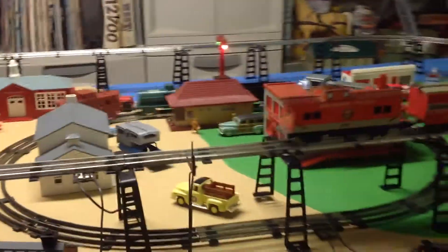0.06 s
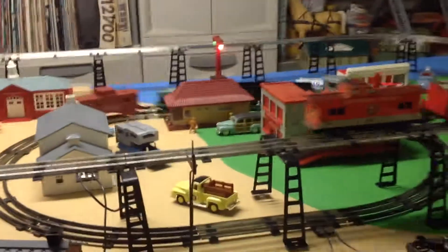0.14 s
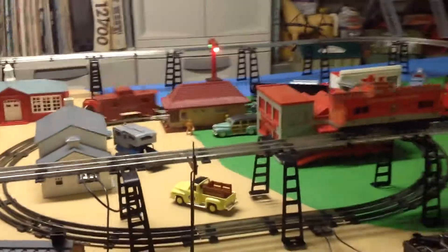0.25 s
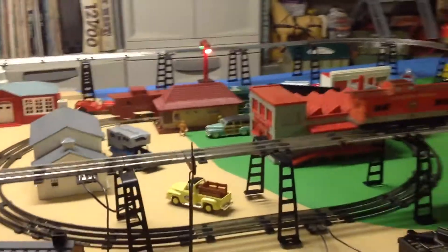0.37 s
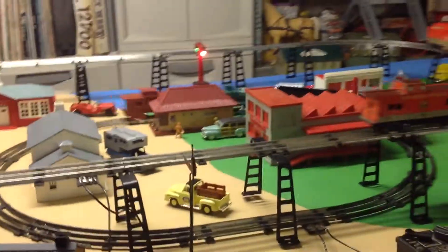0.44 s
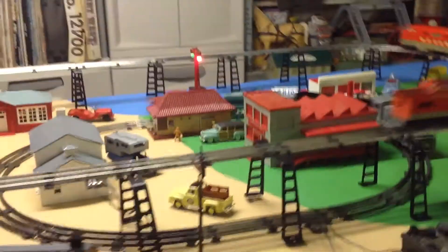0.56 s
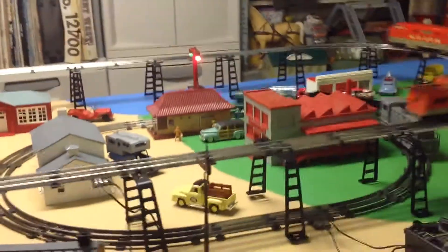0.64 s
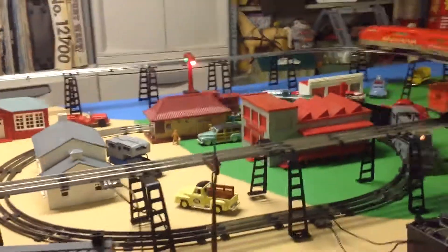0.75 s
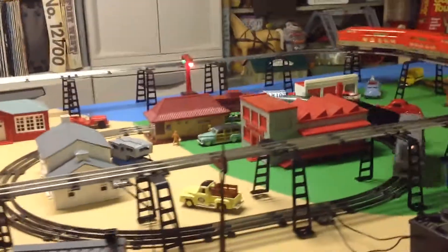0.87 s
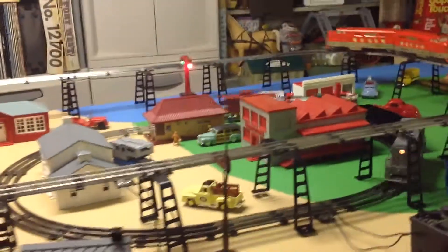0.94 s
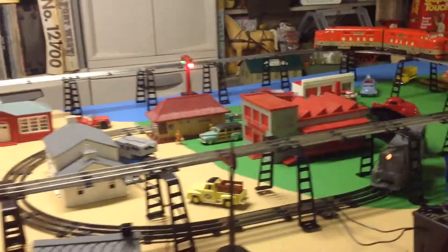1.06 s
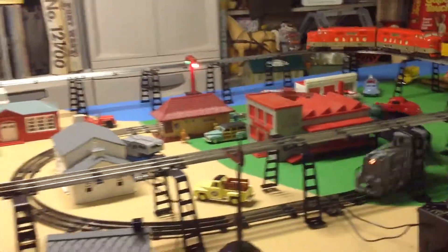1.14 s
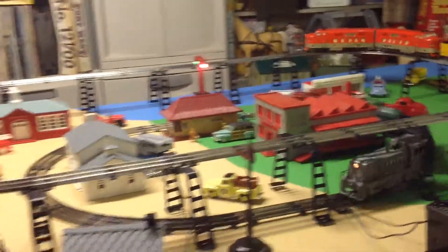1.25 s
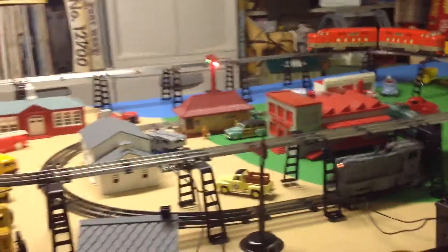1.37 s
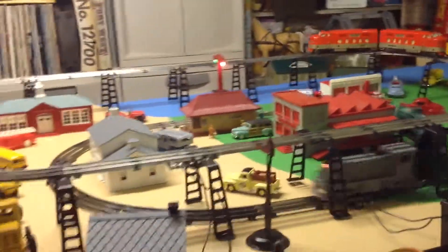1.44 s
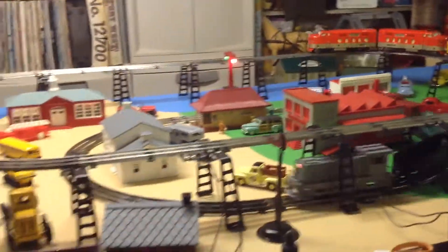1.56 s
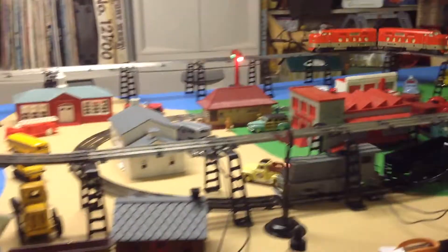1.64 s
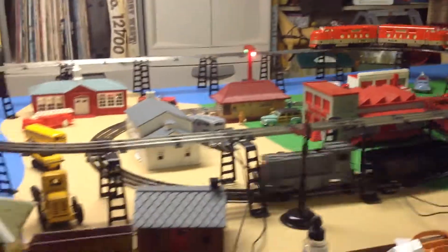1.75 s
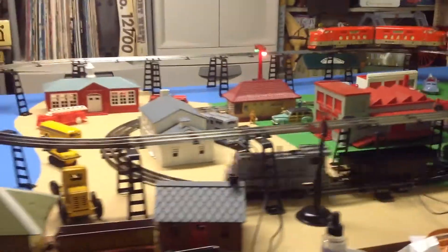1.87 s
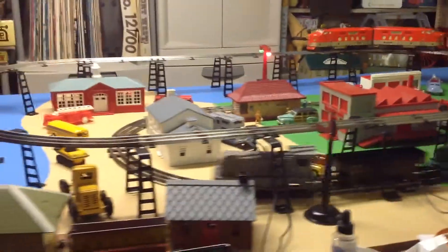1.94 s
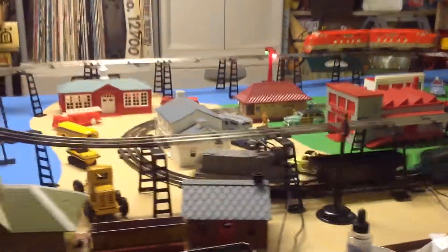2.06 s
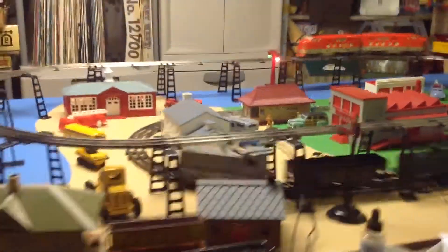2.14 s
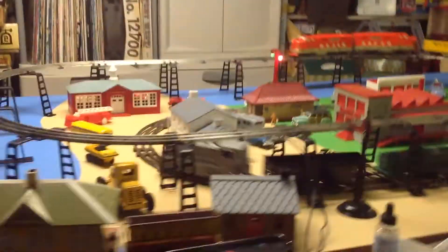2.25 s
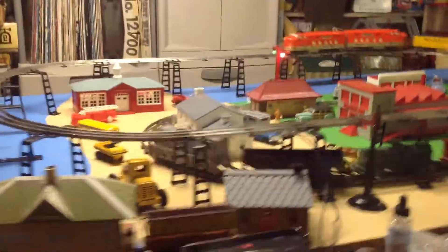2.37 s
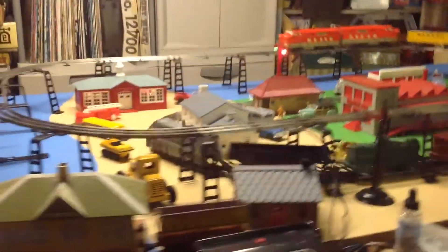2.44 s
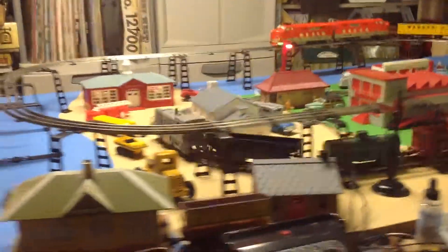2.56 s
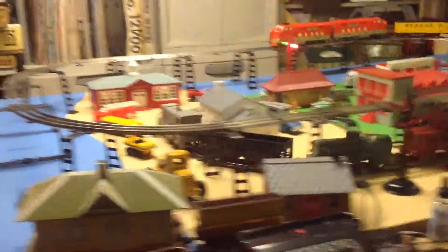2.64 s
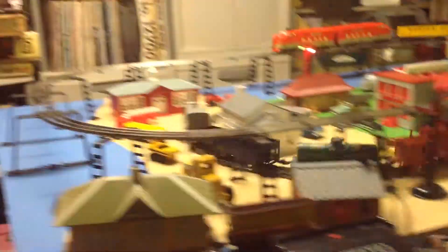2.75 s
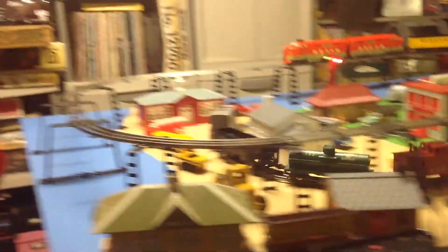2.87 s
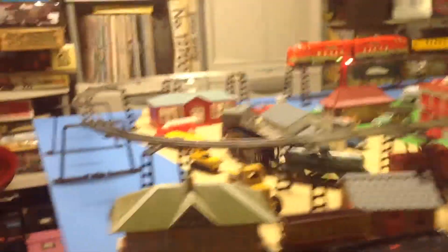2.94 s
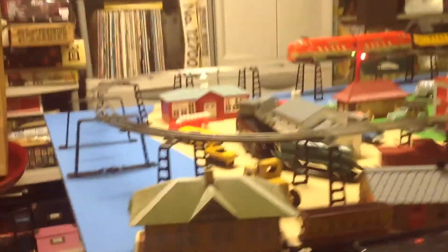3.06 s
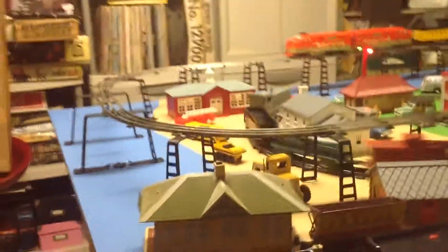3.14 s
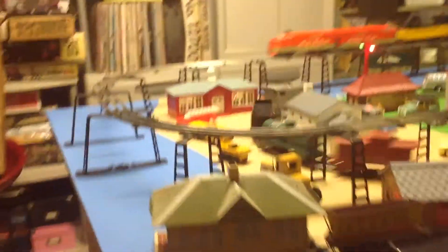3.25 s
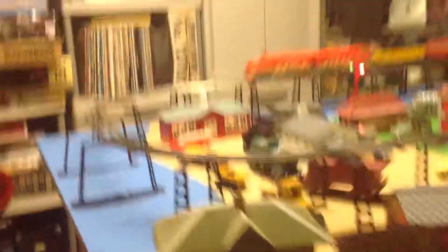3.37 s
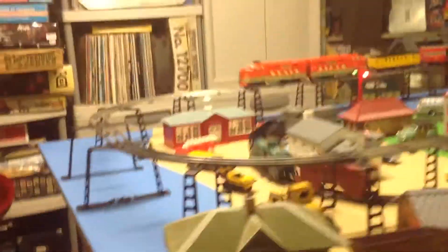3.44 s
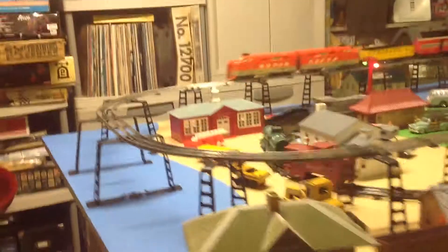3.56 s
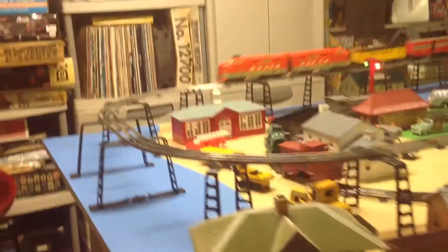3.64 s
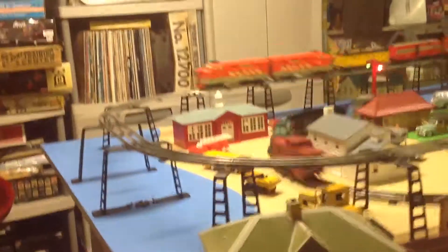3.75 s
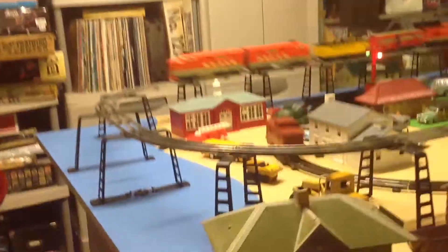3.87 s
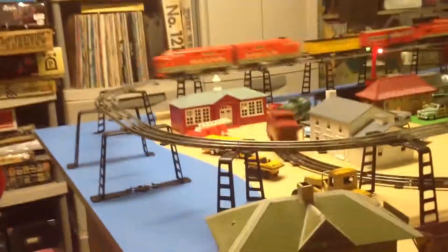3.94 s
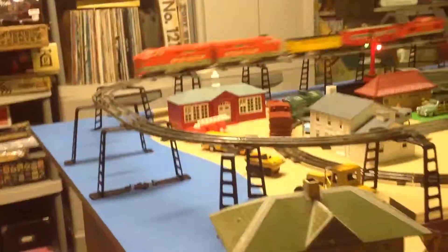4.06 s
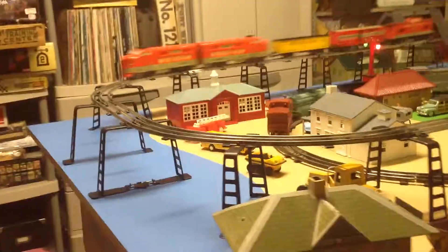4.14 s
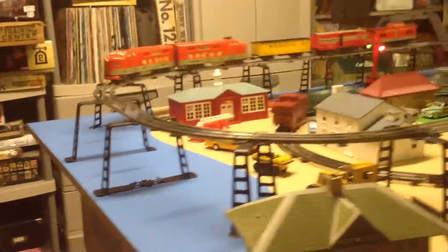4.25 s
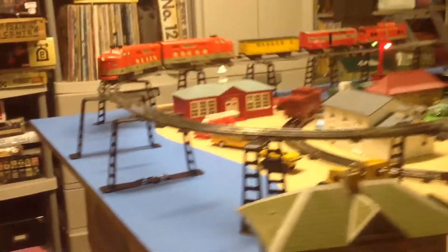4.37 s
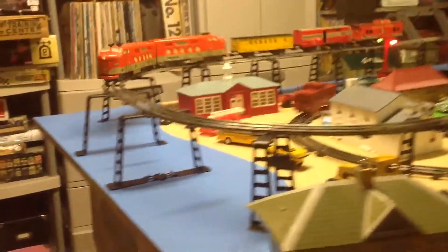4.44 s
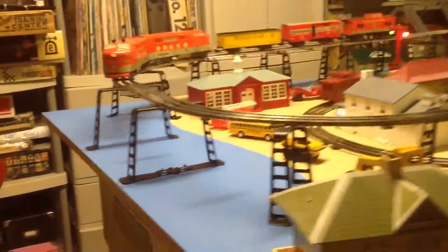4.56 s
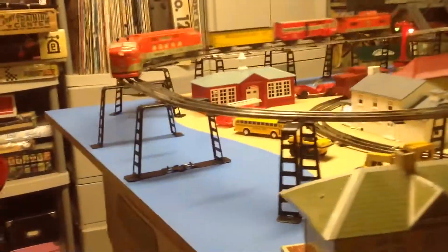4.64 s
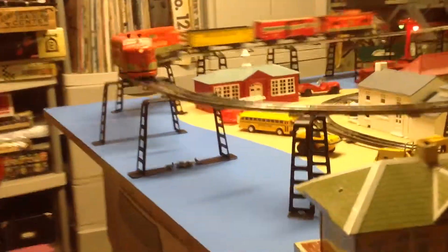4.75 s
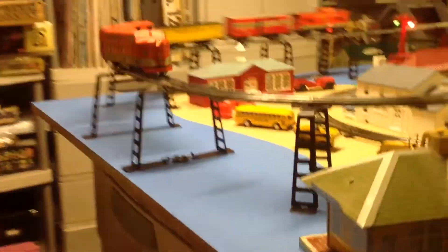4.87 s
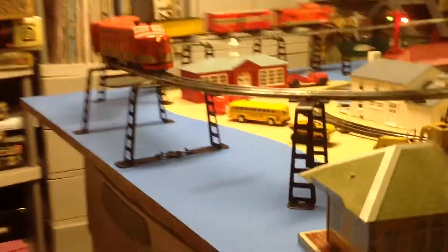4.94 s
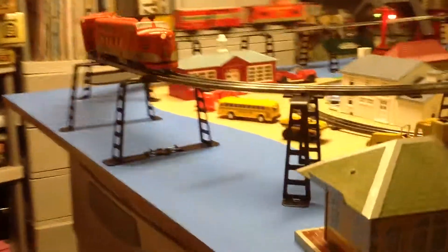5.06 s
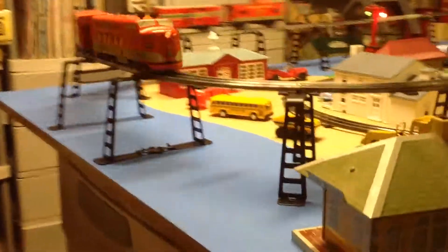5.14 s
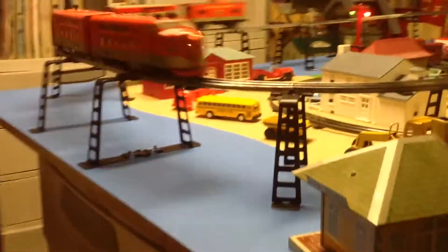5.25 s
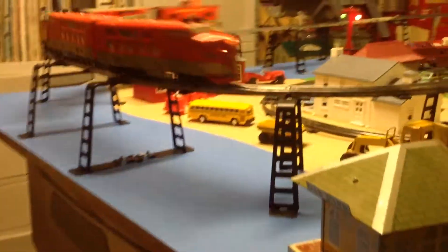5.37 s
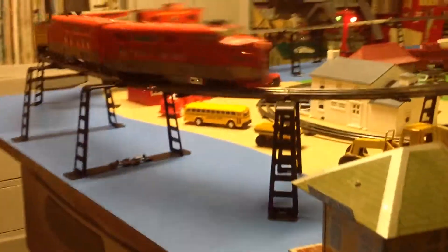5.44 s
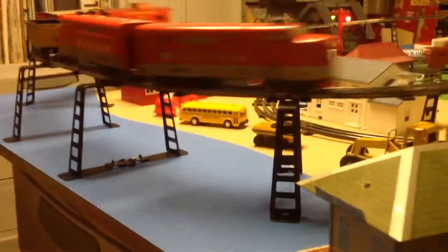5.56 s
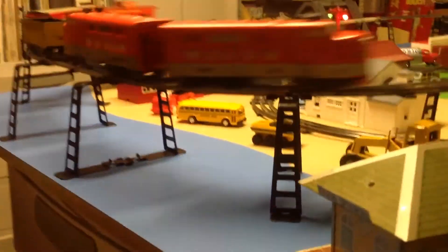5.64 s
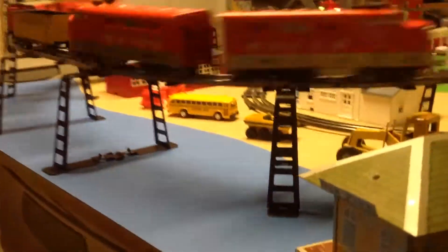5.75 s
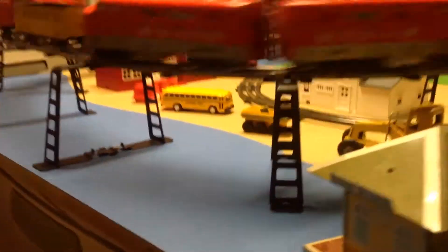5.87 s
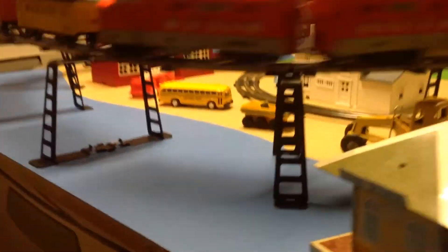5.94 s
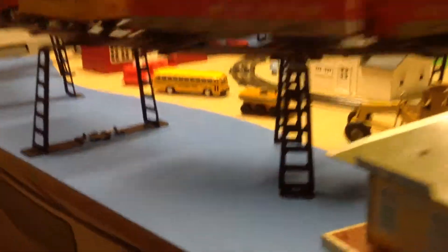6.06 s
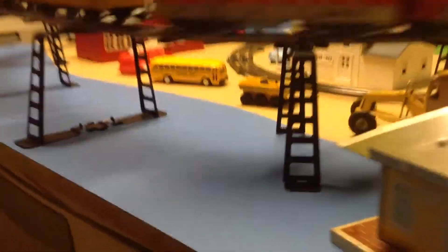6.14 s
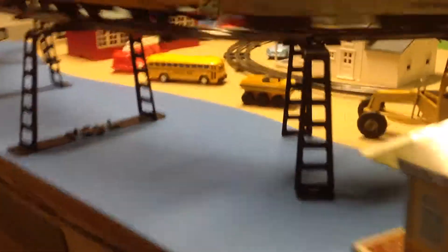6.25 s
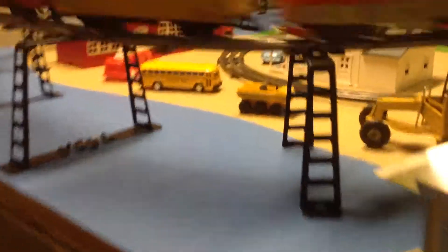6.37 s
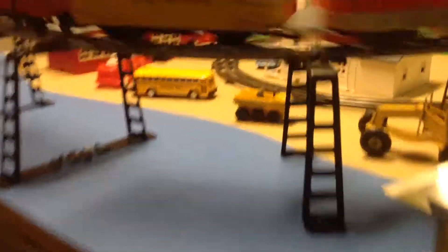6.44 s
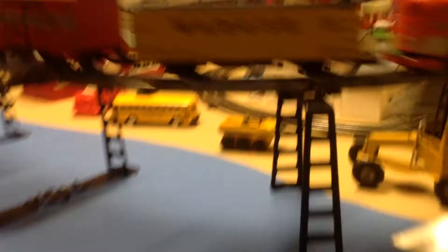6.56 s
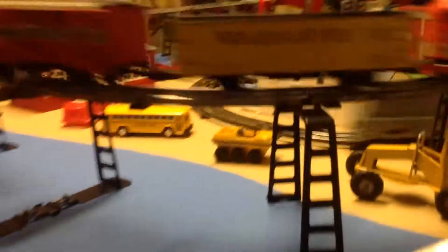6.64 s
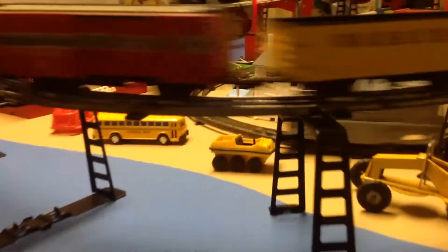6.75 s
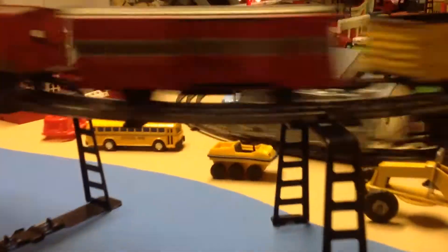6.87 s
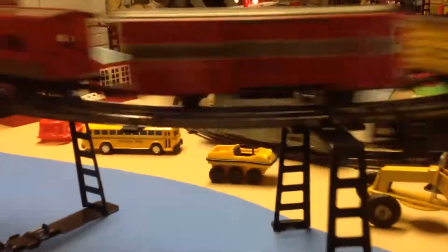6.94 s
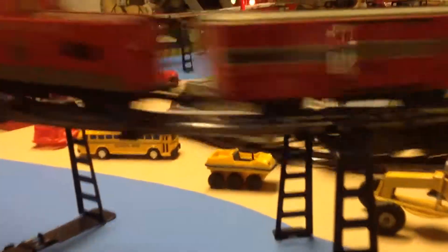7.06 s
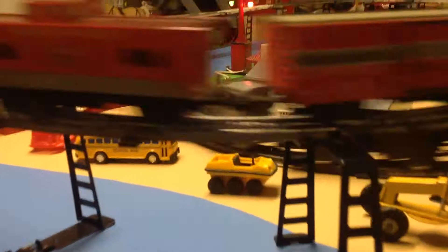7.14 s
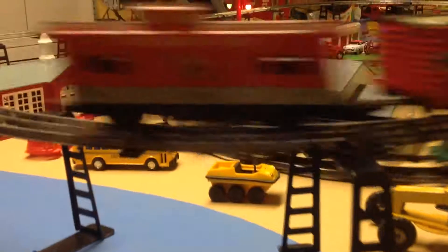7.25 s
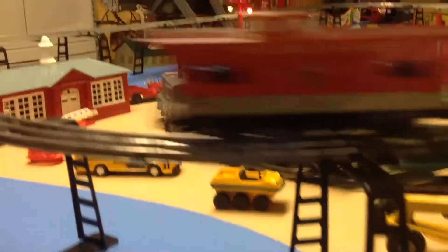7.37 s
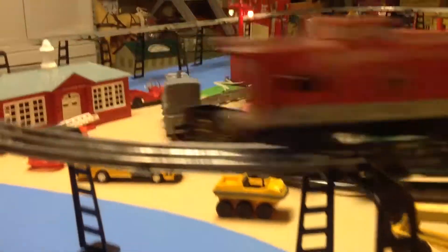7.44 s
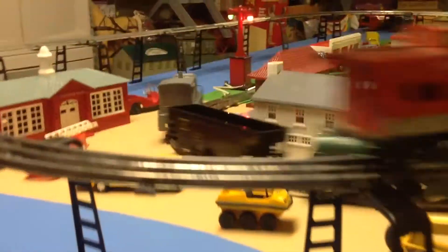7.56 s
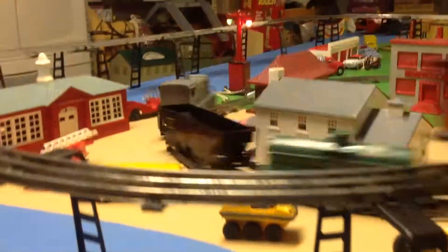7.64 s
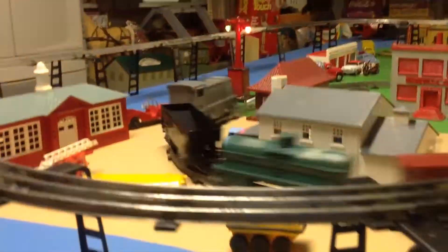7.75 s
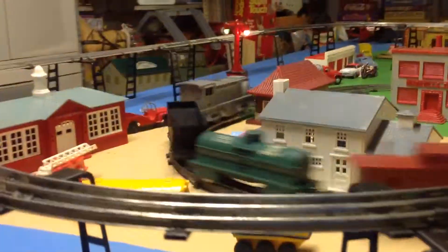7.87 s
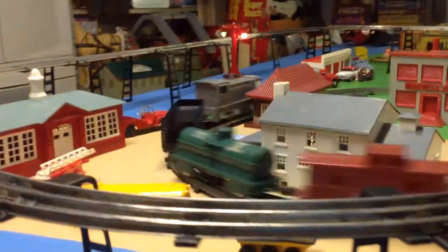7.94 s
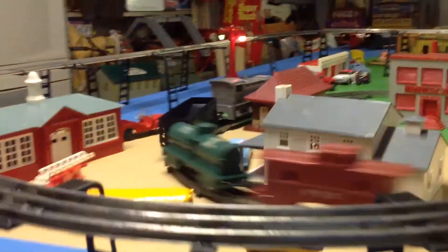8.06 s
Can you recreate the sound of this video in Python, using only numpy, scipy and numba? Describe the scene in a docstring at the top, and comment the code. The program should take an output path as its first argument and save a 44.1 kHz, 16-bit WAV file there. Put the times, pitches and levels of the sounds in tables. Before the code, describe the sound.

Bright gritty rolling of small tin trains on metal rails, clacking over joints, swelling to a loud, harsh close pass near seven seconds, then easing.

```python
"""Two tinplate toy trains run on hollow metal track on a table; a hand-held phone hears them with one microphone.
First wheels grind grit on the rails, tin shells ring with the rolling and axles clack over joints.
From about 2.5 s a flange squeals in the curves; at 3.3 s a finger taps the phone.
After 4 s the hiss swells and the near rail sings; from 5.4 s shells knock, and wheels tick from 6.5 to 7.5 s.
The hiss is strongest near 7 s, then eases; short faint tones and motors under a table rumble run throughout."""
import sys
import numpy as np
from scipy import signal
from scipy.io import wavfile
from scipy.ndimage import uniform_filter1d
from numba import njit

SR = 44100
rng = np.random.default_rng(int(sys.argv[2]) if len(sys.argv) > 2 else 0)


def digitize_waveform(pressure):
    """Quantize a signal to 16-bit integers and store it at the path in sys.argv[1].

    Rows of a 2-D input are taken as channels; values are limited to [-1, 1].
    """
    field = np.atleast_2d(pressure).T
    bounded = np.clip(field, -1, 1)
    quanta = np.round(bounded * 32767).astype(np.int16)
    wavfile.write(sys.argv[1], SR, quanta)


N = 357210  # samples, 8.1 s

# Wheels on rail between jolts. Each row: time in seconds, then levels in dB of rail hiss,
# wheel sizzle and truck rattle.
ROLLING = [(0.0, -26, -28, -34), (0.3, -29, -28, -33), (0.61, -30, -32, -33), (0.88, -30, -31, -32),
           (1.15, -34.5, -32.5, -36), (1.35, -31, -34, -32), (1.62, -34, -36.5, -32.5),
           (1.74, -29, -30, -30.5), (1.94, -28.5, -30.5, -33), (2.37, -27.5, -30.5, -30),
           (2.84, -29, -33, -32.5), (3.09, -27.5, -35, -30), (3.3, -26, -29, -32),
           (3.42, -28.5, -31, -29.5), (3.58, -27, -26.5, -31.5), (3.65, -27, -31, -32.5),
           (3.83, -28, -31.5, -32.5), (4.24, -24, -28.5, -33.5), (4.8, -25, -31.5, -33.5),
           (5.07, -22, -27.5, -33), (5.37, -20.5, -25, -28.5), (5.91, -23.5, -29.5, -29),
           (6.5, -21.5, -25.5, -29), (6.84, -19, -23.5, -25), (7.08, -17, -22, -24), (7.4, -19, -22, -26),
           (7.83, -20.5, -26, -25), (7.96, -24.5, -28, -28), (8.1, -25, -26, -30)]
JOLT_TRUCK_DB, JOLT_SHELL_DB = -15, -22  # under the jolt of the wheels


def undb(db):
    """Gain of a dB value."""
    return 10 ** (np.asarray(db) / 20)


def unit(x):
    """Scaled to rms 1."""
    return x / np.sqrt(np.mean(x ** 2))


def curves(rows):
    """The columns of a table after its times, interpolated to one value a sample."""
    seconds, *columns = np.transpose(rows)
    t = np.arange(N) / SR
    return [np.interp(t, seconds, column) for column in columns]


@njit
def svf(x, g, k):
    """Two state-variable band-passes in a row; g sets the moving centre, k the width over the centre."""
    y = np.empty(len(x))
    b, l, b2, l2 = 0., 0., 0., 0.
    for i in range(len(x)):
        scale = 1 / (1 + g[i] * (g[i] + k))
        v = (b + g[i] * (x[i] - l)) * scale
        b, l = 2 * v - b, l + 2 * g[i] * v
        v = (b2 + g[i] * (k * v - l2)) * scale
        b2, l2 = 2 * v - b2, l2 + 2 * g[i] * v
        y[i] = k * v
    return y


def walk(rate):
    """Random levels held 1 / rate s and slewed twice; spread near 1."""
    k = int(SR / rate)
    held = np.repeat(rng.standard_normal(N // k + 5), k)
    slewed = uniform_filter1d(uniform_filter1d(held, k), k)
    return 1.34 * slewed[2 * k:][:N]


def grit(spiky_db):
    """Rough wheel on rough rail: a dense stream of tiny knocks, a few of them larger."""
    size_db = spiky_db * rng.exponential(size=N)
    return unit(rng.standard_normal(N) * undb(size_db))


def ring(modes, spiky_db, drift, flicker_db, shake_db=0.):
    """Grit in each resonance; many cars share it, so its centre drifts and its level flickers."""
    out = 0
    for hz, width, db in modes:
        centre = np.clip(hz * (1 + drift * walk(6)), 40, .4 * SR)
        band = svf(grit(spiky_db), np.tan(np.pi * centre / SR), 1.94 * width / np.mean(hz))
        # a wider resonance takes up more of the grit
        out = out + unit(band) * np.sqrt(width) * undb(db + flicker_db * walk(13))
    return unit(out * undb(shake_db))


def wheel_wobble():
    """Uneven wheels waver quickly in level (dB); rocking cars load them unevenly, more slowly."""
    return 0.36 * walk(45) + 0.9 * walk(90) + .3 * walk(14)


def joints():
    """Each joint shakes the axle for a moment: a quick swell of the rolling, in the rail and in the wheels."""
    # Each row: start in seconds, added rail hiss in dB, added wheel sizzle in dB, length in seconds.
    joint_rows = [(0.31, -47, -38, 0.021), (0.828, -30, -30, 0.053), (0.978, -37, -36, 0.04),
                  (1.29, -41, -36, 0.069), (1.429, -39, -38, 0.025), (1.494, -37, -33, 0.033),
                  (1.69, -38, -36, 0.12), (1.862, -30, -32, 0.058), (2.118, -25, -27, 0.041),
                  (2.235, -24, -31, 0.017), (2.283, -30, -29, 0.027), (2.46, -33, -40, 0.033),
                  (2.554, -37, -44, 0.044), (2.702, -37, -33, 0.016), (2.94, -42, -40, 0.031),
                  (3.575, -33, -33, 0.035), (3.913, -37, -43, 0.023), (3.963, -35, -34, 0.038),
                  (4.256, -45, -45, 0.029), (4.5, -34, -30, 0.066), (4.878, -24, -30, 0.027),
                  (5.197, -29, -26, 0.034), (5.372, -37, -41, 0.037), (5.783, -31, -31, 0.047),
                  (5.914, -35, -30, 0.033), (6.028, -33, -41, 0.017), (6.067, -37, -28, 0.044),
                  (6.24, -31, -27, 0.064), (6.505, -27, -30, 0.05), (6.721, -24, -41, 0.022),
                  (6.905, -26, -48, 0.024), (7.05, -29, -29, 0.046), (7.13, -23, -29, 0.03),
                  (7.254, -24, -48, 0.028), (7.504, -29, -27, 0.058), (7.57, -24, -31, 0.017),
                  (7.715, -31, -39, 0.039), (7.892, -27, -30, 0.086)]
    t, envelope = np.arange(N) / SR, np.zeros((2, N))
    for s, rail_db, wheel_db, length in joint_rows:
        age = np.clip((t - s) / length, 0, 50)  # in lengths
        swell = (2 * age * np.exp(1 - 2 * age)) ** 3
        envelope += undb([[rail_db], [wheel_db]]) * swell
    return envelope


def rolling(clack, jolt, wobble_db):
    """Wobbling wheels grind grit on the rail: rail hiss, wheel sizzle and truck rattle ring alike."""
    # Each row of the three: centre in Hz, width setting in Hz, relative level in dB.
    rail_modes = [(11520, 1670, -0.78), (13000, 1600, 0.43), (14600, 2000, -0.77)]
    wheel_modes = [(7460, 510, -2.5), (8230, 1700, -2), (9590, 1930, 3.5)]
    truck_modes = [(3070, 1290, 3.5), (4050, 800, 1)]
    hiss_db, wheel_db, truck_db = curves(ROLLING)
    rail = (undb(hiss_db) + clack) * ring(rail_modes, 1.9, .01, 1., wobble_db)
    wheels = (undb(wheel_db) + jolt) * ring(wheel_modes, 1.9, 0.02, .9, wobble_db)
    truck_gain = undb(truck_db) + undb(JOLT_TRUCK_DB) * jolt
    return rail + wheels + truck_gain * ring(truck_modes, 2.0, 0.014, 0.7, wobble_db)


def shell_gains():
    """Gain of each group of shell resonances: the powers of the three kinds of car add up."""
    # Each row: time in seconds, level in dB of the deep-ringing, bright and middle-ringing cars.
    car_levels = [(0.0, -31, -32, -35.5), (0.3, -32.5, -34, -37), (0.65, -33, -34.5, -38),
                  (0.9, -36.5, -34, -32.5), (1.2, -37.5, -37.5, -36), (1.45, -31.5, -35, -43),
                  (1.85, -40.5, -32.5, -40.5), (2.3, -37.5, -37.5, -33), (2.9, -39, -33.5, -36),
                  (3.3, -35.5, -33, -35), (3.9, -36, -31.5, -34.5), (4.3, -33.5, -34, -33.5),
                  (4.8, -35, -34, -33), (5.25, -42, -43, -28), (5.45, -26.5, -38, -31),
                  (5.7, -29.5, -46, -31), (6.0, -31.5, -37, -27.5), (6.45, -36.5, -30.5, -29),
                  (6.8, -30.5, -29.5, -29), (7.15, -27.5, -30, -27), (7.45, -39, -29, -26.5),
                  (7.75, -30.5, -27, -28.5), (8.1, -40, -31, -27.5)]
    # One row for each kind of car: share in dB of the main ring, then of the other four
    # groups of shell resonances from low to high.
    car_shares = [(1.5, -6, -8.5, -8, -23), (-9, -6.5, -17, -1, -5.5), (-4.5, -10, -1, -8, -3)]
    return np.sqrt(undb(np.transpose(car_shares)) ** 2 @ undb(curves(car_levels)) ** 2)


def tin_shells(gains, jolt, wobble_db):
    """Tin car bodies ring with the rolling; two of their rings slide in pitch."""
    # The strongest ring slides as other cars come nearest. Each row: time in seconds, pitch in Hz.
    main_pitch = [(0, 990), (.45, 1046), (.75, 1040), (1.0, 920), (1.25, 980), (1.45, 930), (1.6, 950),
                  (2.0, 995), (4.55, 980), (4.75, 1040), (5.3, 1020), (5.5, 1030), (5.72, 970), (5.9, 996),
                  (6.8, 1010), (8.1, 1010)]
    # The sliding ring above it. Each row: time in seconds, pitch in Hz.
    upper_pitch = [(0, 1215), (.9, 1236), (3.5, 1248), (4.5, 1293), (5.0, 1260), (5.4, 1210), (5.65, 1290),
                   (6.2, 1283), (7.0, 1227), (8.1, 1280)]
    # Three groups of steadier resonances. Each row: centre in Hz, width setting in Hz, relative level in dB.
    steady_modes = [
        [(676, 136, -0.68), (805, 110, 1.2)],
        [(1580, 310, 0), (1903, 217, 0)],
        [(2350, 230, -1.5), (2653, 390, 0.55)],
    ]
    main = [(curves(main_pitch)[0], 100, 0)]
    upper = [(curves(upper_pitch)[0], 95, 0)]
    groups = [main, steady_modes[0], upper] + steady_modes[1:]
    shake_db = 0.47 * wobble_db  # share of the wobble that reaches the shells
    out = 0
    for modes, gain in zip(groups, gains):
        out = out + (gain + undb(JOLT_SHELL_DB) * jolt) * ring(modes, 1.0, 0.018, .55, shake_db)
    return out


def freight_cars():
    """Freight cars on the lower loop: grit in one narrow ring of sliding pitch."""
    # Each row: time in seconds, pitch in Hz, level in dB.
    freight_rows = [(0, 1850, -52), (.85, 1900, -39), (1.2, 1830, -42), (2.0, 1790, -48), (2.25, 1770, -30),
                    (2.8, 1870, -39), (3.05, 1690, -36), (3.7, 1640, -35.5), (4.3, 1700, -36),
                    (4.7, 1820, -43), (5.2, 1800, -42), (6.8, 1940, -40), (7.4, 1900, -39),
                    (8.1, 1940, -28)]
    hz, db = curves(freight_rows)
    return undb(db) * ring([(hz, 154, 0)], 0.65, 0.012, 0.97)


def flange_squeal():
    """A flange squeals on the rail in the curves: spiky grit in a narrow ring of sliding pitch."""
    # Each row: time in seconds, pitch in Hz, level in dB.
    squeal_rows = [(0, 5500, -52), (2.3, 5550, -52), (2.47, 5400, -42), (2.55, 5500, -33),
                   (2.62, 5470, -41), (2.8, 5500, -41), (2.95, 5550, -31), (3.1, 5300, -39),
                   (3.35, 5380, -42), (3.47, 5320, -34), (3.58, 5470, -43), (3.74, 5420, -34),
                   (3.84, 5340, -33), (3.88, 5300, -46), (4.02, 5330, -36), (4.2, 5370, -36),
                   (4.3, 5360, -46), (5.02, 5500, -50), (5.12, 5440, -35), (5.28, 5600, -38),
                   (5.5, 5530, -40), (5.8, 5440, -45), (8.1, 5530, -44)]
    hz, db = curves(squeal_rows)
    return undb(db) * ring([(hz, 170, 0)], 1.5, .003, 1.)


def wheel_scrape(jolt, wobble_db):
    """Wheel sides scrape the rail in two broad rings, swelling with the jolts."""
    # Each row: time in seconds, level in dB of the lower and of the upper ring.
    scrape_levels = [(0.0, -34, -27.5), (0.29, -33, -34), (1.01, -33.5, -37), (1.17, -42, -39),
                     (1.28, -36, -33), (1.62, -37, -35), (1.8, -32, -38), (2.1, -33, -40),
                     (2.23, -29.5, -36), (2.46, -31.5, -37), (2.66, -31, -42), (3.13, -30, -34),
                     (3.25, -30.5, -36), (3.41, -28.5, -27.5), (3.62, -30, -28.5), (3.72, -26.5, -33),
                     (3.83, -28.5, -42), (3.88, -39, -38), (4.17, -38, -30.5), (4.83, -39, -34),
                     (5.37, -31, -37), (6.47, -35.5, -37), (7.17, -33, -31), (7.55, -29.5, -35),
                     (8.1, -31, -38)]
    # Each row: centre in Hz, width setting in Hz, relative level in dB.
    scrape_modes = [(5180, 1050, 0), (6820, 2140, 0)]
    out = 0
    for mode, db in zip(scrape_modes, curves(scrape_levels)):
        gain = undb(db) + undb(JOLT_TRUCK_DB) * jolt
        out = out + gain * ring([mode], 1.6, 0.017, 0.78, wobble_db)
    return out


def rail_singing():
    """The near rail sings ahead of the train in one high, flickering resonance."""
    # Each row: time in seconds, level in dB.
    sing_levels = [(0, -44), (3.9, -46), (4.6, -32), (4.9, -35), (5.2, -51), (6.0, -33), (6.3, -47),
                   (8.1, -53)]
    # One row: centre in Hz, width setting in Hz, relative level in dB.
    sing_modes = [(8450, 420, 0)]
    return undb(curves(sing_levels)[0]) * ring(sing_modes, 1.5, .004, 1.5)


def blows(rows, t60_s):
    """Each blow is a spit of grit and a short ring at its own pitch."""
    age = np.arange(SR // 10) / SR
    out = np.zeros(N + len(age))
    fade = np.exp(-np.log(1000) * age / t60_s) * np.minimum(age / .002, 1)
    for s, db, hz in rows:
        g = np.full(len(age), np.tan(np.pi * hz / SR))
        spit = unit(svf(rng.standard_normal(len(age)), g, .6))
        tone = np.sin(2 * np.pi * hz * age)
        out[int(s * SR):][:len(age)] += undb(db) * fade * (.7 * tone + .55 * spit)
    return out[:N]


def knocks_and_ticks():
    """Couplers and shells knock singly; wheels tick more sharply, with a shorter ring, on rail ends."""
    # Each row of both: start in seconds, level in dB, ring in Hz.
    knock_rows = [(1.031, -21, 880), (5.453, -16, 1050), (5.505, -13, 1013), (5.878, -15, 985),
                  (6.836, -15, 987), (7.05, -13, 1090), (7.643, -16, 1173)]
    tick_rows = [(2.098, -20, 4330), (2.224, -21, 4350), (6.484, -19, 2630), (6.647, -15, 3070),
                 (6.769, -21, 2900), (6.898, -19, 2610), (7.069, -17, 2720), (7.089, -18, 2720),
                 (7.266, -14, 2570), (7.309, -18, 2720), (7.379, -17, 2620), (7.489, -15, 2830),
                 (7.544, -18, 2570)]
    return blows(knock_rows, t60_s=.07) + blows(tick_rows, t60_s=.035)


def tap():
    """A finger on the phone: one dull cycle through its case."""
    start_s, hz, spread_s = 3.2817, 520, .00065
    age = np.arange(N) / SR - start_s
    return undb(-6) * np.sin(2 * np.pi * hz * age) * np.exp(-.5 * (age / spread_s) ** 2)


def short_tones(low_hz, high_hz, count, pitch_count):
    """Short faint tones at random times, each decaying near one of a set of random pitches."""
    t60_s, attack_s = .12, 0.0078
    age = np.arange(SR // 12) / SR
    out = np.zeros(N + len(age))
    fade = np.exp(-np.log(1000) * age / t60_s) * np.minimum(age / attack_s, 1)
    pitches = low_hz * (high_hz / low_hz) ** rng.random(pitch_count)
    for when, pick, detune, size in rng.random((count, 4)):
        hz = pitches[int(pick * pitch_count)] * (1 + 0.0097 * detune)
        out[int(when * N):][:len(age)] += undb(8 * size) * fade * np.sin(2 * np.pi * hz * age)
    return unit(out[:N])


def faint_tones(gains):
    """Lower short tones follow the level of the highest shell resonances, higher ones the truck rattle."""
    truck_db = curves(ROLLING)[2]
    lower = gains[-1] * short_tones(550, 3200, count=1900, pitch_count=70)
    higher = undb(truck_db - 2) * short_tones(6500, 14500, count=3200, pitch_count=200)
    return lower + higher


def motors():
    """Through the table: a wavering armature growl, a rough gear whirr and the transformer's hum."""
    # Each row: time in seconds, growl pitch in Hz, growl level in dB, gear whirr level in dB.
    motor_rows = [(0, 180, -52, -66), (1.5, 172, -57, -79), (1.85, 186, -43, -64), (2.1, 186, -52, -56),
                  (2.4, 186, -43, -38), (2.8, 180, -53, -53), (3.2, 175, -68, -44), (5.3, 162, -65, -45),
                  (5.75, 160, -44.5, -48), (6.1, 160, -61, -52), (6.7, 180, -53, -35.5),
                  (7.15, 176, -42, -44.5), (7.4, 174, -54, -41.5), (8.1, 178, -54, -46)]
    # One row: centre in Hz, width setting in Hz, relative level in dB.
    gear_modes = [(306, 38, 0)]
    hum_hz, hum_db = 119.5, -55
    hz, growl_db, gear_db = curves(motor_rows)
    turns = np.cumsum(hz * (1 + 0.028 * walk(20))) / SR
    growl = np.sqrt(2) * np.sin(2 * np.pi * turns) * undb(growl_db + 2.0 * walk(25))
    whirr = undb(gear_db) * ring(gear_modes, 0., 0.02, 0.75)
    hum = np.sqrt(2) * np.sin(2 * np.pi * hum_hz * np.arange(N) / SR)
    return growl + whirr + undb(hum_db) * hum


def table_rumble():
    """The table top rumbles in low rings that sway in level; the trestle rings above them."""
    # Each row: time in seconds, level in dB of the low rings, level in dB of the trestle ring.
    rumble_levels = [(0, -40, -42), (.8, -42, -42), (1.5, -40.5, -40), (2.2, -42.5, -44.5),
                     (2.9, -42.5, -48), (3.5, -41, -46), (4.4, -40, -43.5), (5.0, -42, -45),
                     (6.2, -38, -44), (7.0, -43.5, -45.5), (7.5, -40, -47), (8.1, -39, -46)]
    # Each row of both: centre in Hz, width setting in Hz, relative level in dB.
    low_modes = [(175, 95, 4), (265, 130, 1)]
    trestle_modes = [(535, 75, 0)]
    low_db, trestle_db = curves(rumble_levels)
    low = undb(low_db + 0.96 * walk(2.58)) * ring(low_modes, 0., 0.023, 1.0)
    return low + undb(trestle_db) * ring(trestle_modes, 0., 0.017, 1.0)


def scene():
    """Both trains together; one wobble and the same jolts shake rail, wheels, trucks and shells."""
    wobble_db = wheel_wobble()
    clack, jolt = joints()
    gains = shell_gains()
    mono = rolling(clack, jolt, wobble_db)
    mono += tin_shells(gains, jolt, wobble_db) + freight_cars()
    mono += flange_squeal() + wheel_scrape(jolt, wobble_db) + rail_singing()
    mono += knocks_and_ticks() + tap() + faint_tones(gains)
    mono += motors() + table_rumble()
    return np.array([mono, mono])


def record(dry):
    """The microphone drops the deep bass, its circuit adds a faint low noise and the top is cut."""
    low_cut_hz, top_hz, noise_hz, noise_db = 148, 15350, 85, -74
    thin = signal.sosfilt(signal.butter(5, low_cut_hz, "high", fs=SR, output="sos"), dry)
    thin = thin + undb(noise_db) * ring([(noise_hz, noise_hz, 0)], 0., 0., 0.)
    return signal.sosfilt(signal.ellip(10, .2, 80, top_hz, fs=SR, output="sos"), thin)


dry = scene()
out = record(dry)
digitize_waveform(out)
```